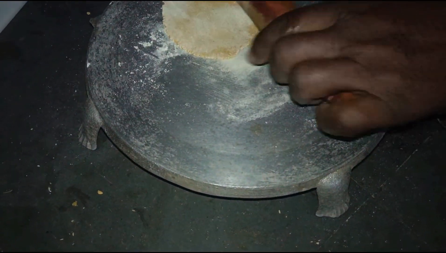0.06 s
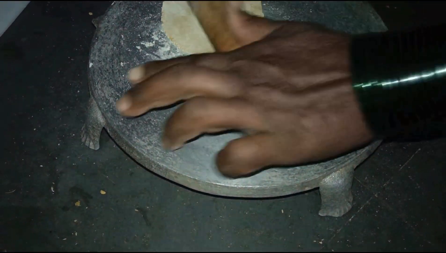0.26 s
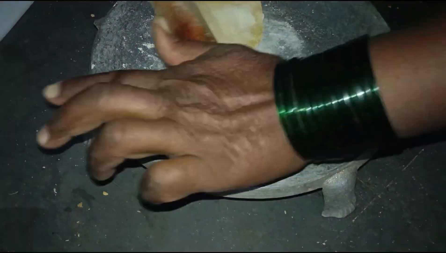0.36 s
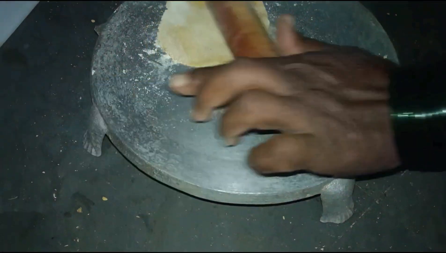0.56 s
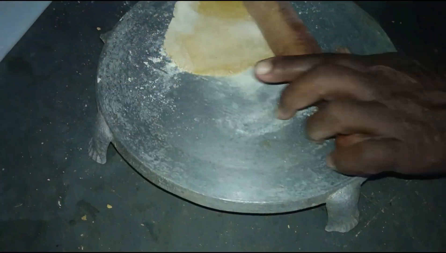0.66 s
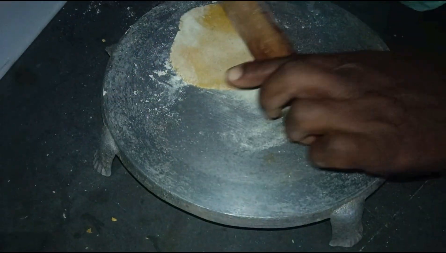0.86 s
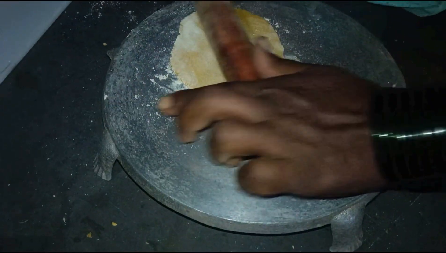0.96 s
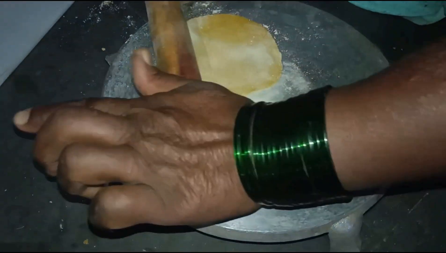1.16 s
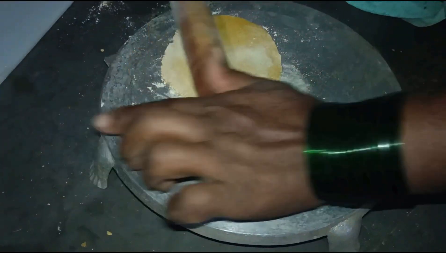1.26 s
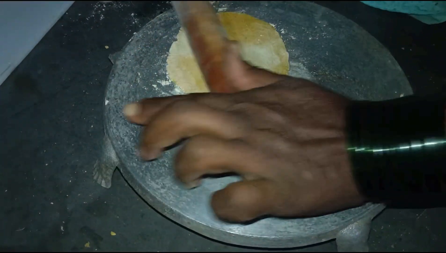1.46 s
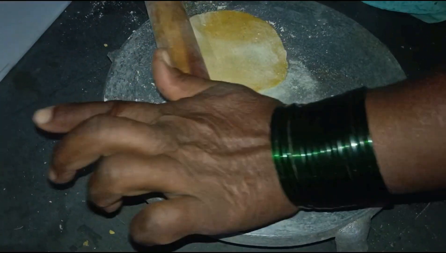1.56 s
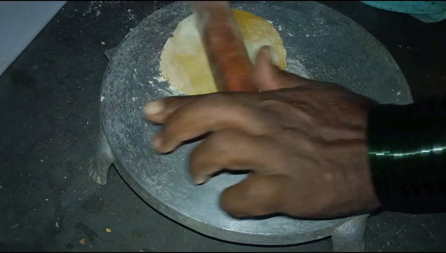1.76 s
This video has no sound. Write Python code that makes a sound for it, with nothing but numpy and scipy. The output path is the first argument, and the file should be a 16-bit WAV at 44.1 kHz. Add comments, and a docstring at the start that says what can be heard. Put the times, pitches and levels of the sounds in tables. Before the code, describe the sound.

A wooden rolling pin strikes a metal board with a sharp clatter, then rumbles over dough; it rubs and groans, knocks again, and ends with light taps and bangle clinks, close in a hard-walled kitchen.

```python
"""A wooden rolling pin works dough on a three-legged metal board in a bare kitchen, close to a phone.
Hard blows ring pin and board first; a soft dough thud, a low rumble and floury hiss follow.
Around 0.7 s the pin rubs and groans and a glass bangle clinks; near 1 s more blows land and the dough rumbles on.
Light knocks, more clinks and faint groans end it. Blows and clinks are decaying tones and noise bursts with
a tail from the hard walls; rumble, rubbing and hiss are noise shaped by resonances and level curves."""
import sys
import numpy as np
from scipy import signal
from scipy.io import wavfile
from scipy.ndimage import uniform_filter1d

SR = 44100
rng = np.random.default_rng(int(sys.argv[2]) if len(sys.argv) > 2 else 0)


def transcribe(u):
    """Save the signal u as a 16-bit wav file named by the first command-line argument.

    u: samples, shape (n,) or (channels, n), limited to [-1, 1]; the rate is SR.
    q: integer samples, one column per channel.
    """
    v = np.clip(np.atleast_2d(u).T, -1, 1)
    q = np.round(v * 32767).astype(np.int16)
    wavfile.write(sys.argv[1], SR, q)


N = 79380  # samples, 1.8 s

FLICKER_DB, FLICKER_HZ = 5, 30.24  # usual spread of the random levels before smoothing, new levels per second
PORT_HZ = 1265  # the left-right difference grows with pitch up to here


def undb(db):
    """Turn decibels into a gain: 20 dB is ten times the amplitude."""
    return 10 ** (np.asarray(db) / 20)


def curve(table, axis):
    """Follow one column of a table over time in straight lines; column 0 holds the times."""
    rows = np.array(table, float)
    return np.interp(np.arange(N) / SR, rows[:, 0], rows[:, axis])


def band(x, hz, width_hz):
    """Pass a sound twice through one resonance, then set its rms to 1."""
    b, a = signal.iirpeak(min(hz, .45 * SR), hz / width_hz, SR)
    once = signal.lfilter(b, a, x)
    twice = signal.lfilter(b, a, once)
    return twice / np.sqrt(np.mean(twice ** 2))


def spread(pan_db):
    """Left and right gains whose difference is pan_db; positive is louder on the left."""
    return undb(np.array([pan_db, -pan_db]) / 2)


def add(out, sound, at_s):
    """Mix a sound in at its start time, cut off at the end of the scene."""
    k = int(at_s * SR)
    out[:, k:k + sound.shape[1]] += sound[:, :N - k]


def ring(modes, chance, sign=-1, detune=.018):
    """A struck body rings in decaying sines; chance shifts their pitch, level and left-right phase."""
    rise_s, scatter_db, port_phase_rad = 0.00022, 1.5, 1.7
    count = len(modes)
    hz, db, t60 = np.array(modes, float).T[:, :, None]
    t = np.arange(SR // 4) / SR
    hz = hz * (1 + detune * chance[:count, None])
    # each sine reaches the phone's two ports out of step, less so in the bass
    lead = port_phase_rad * np.minimum(hz / PORT_HZ, 1) * np.sign(chance[:count, None]) / 2
    decay = 1000 ** (-t / np.maximum(t60, 1e-3))  # 60 dB down after t60
    size = undb(db + scatter_db * chance[-count:, None]) * decay
    size = size * sign ** np.arange(count)[:, None]  # sign -1 turns every second sine over
    size = size * (1 - np.exp(-t / rise_s))
    return np.array([(size * np.sin(2 * np.pi * hz * t + s * lead)).sum(0) for s in (1, -1)])


def noise(bands, alike, flicker_db=FLICKER_DB):
    """Noise in resonances that flicker each alone, rms 1; alike is how much left and right agree."""
    out, hold = 0, int(SR / FLICKER_HZ)
    alike = np.clip(alike, 0, 1)
    for hz, width_hz, db in bands:
        mid, side = band(rng.standard_normal((2, N)), hz, width_hz)
        steps = np.repeat(rng.standard_normal(200)[:N // hold + 1], hold)
        walk = uniform_filter1d(steps, hold)[:N]  # the random steps become slopes
        pair = np.sqrt(1 + alike) * mid + np.sqrt(1 - alike) * side * np.array([[1], [-1]])
        out = out + undb(db + flicker_db * walk) * pair / np.sqrt(2)
    return out / np.sqrt(np.mean(out ** 2))


def knocks():
    """Each blow pushes pin and board for its contact time (longer is duller); the loose board clatters."""
    # blows: start_s, pin_db, board_db, clatter_db (all before the low cut and the push), contact_ms,
    # lowest_hz that sounds, spot_hz that the struck spot favours, room_db sent to the walls
    blows = [(0.2129, -13.5, -27, -13.5, 0.12, 806, 1906, -4),
             (0.2189, -27, -16, -17, 0.37, 636, 1400, -0.5), (.2250, -40, -24, -18.5, 0.55, 324, 650, -2),
             (.6915, -69, -48, -68.5, 0.56, 250, 423, 3.5), (.7812, -33.5, -32, -35, 0.55, 800, 1310, -6),
             (.7960, -58, -37, -49.5, 0.24, 900, 1345, -21), (.8010, -46.5, -41, -49, 0.58, 900, 1400, -11),
             (.9668, -34.5, -16, -24, 0.83, 150, 468, -7), (.9694, -34, -20.5, -35, 0.4, 303, 1340, -9),
             (0.9742, -30, -18, -15, 0.16, 300, 1460, -6.5),
             (.9770, -40.5, -32.5, -57.5, 0.31, 600, 1900, -6),
             (.9810, -52.5, -30, -71, 0.75, 396, 1400, -13.5), (.9900, -20, -24.5, -40.5, 2, 249, 543, -4),
             (1.396, -57, -31.5, -38, 0.27, 330, 720, -13.5), (1.427, -54, -51, -47, 3.2, 149.3, 358, -20),
             (1.4985, -47, -42, -41.5, 0.64, 920, 1470, -7.5)]
    # tones of the wooden pin, before scatter: pitch_hz, level_db, t60_s (time to fall 60 dB)
    pin_tones = [(1174, 7.5, 0.016), (1255, 2.5, 0.03), (1862, 1, 0.032), (2710, 2, 0.014),
                 (2886, 0.5, 0.031), (3134, 3.5, 0.03), (3964, -3, 0.03)]
    # tones of the metal board, before scatter and spot: pitch_hz, level_db, t60_s
    board_tones = [(279.1, -7.5, 0.12), (405.2, -8, 0.06), (505, -7, 0.065), (608, -13.5, 0.084),
                   (712.4, -4, 0.066), (822, 1.5, 0.03), (1201, 1, 0.047), (1328, 6, 0.041),
                   (1446, 4, 0.034), (1711, 3, 0.032), (1991, 13.5, 0.0087), (2454, 2.5, 0.023)]
    # noise of the board clattering on its legs: centre_hz, width_hz (of one pass), relative level_db
    clatter_bands = [(765, 930, 3.5), (1510, 2700, -15), (3020, 3650, 1), (4580, 2250, -2.5),
                     (7550, 3300, -24.5)]
    spot_db_per_octave = 6  # loss away from the favoured pitch
    clatter_s, room_feed_s = 0.0072, .007  # time constants

    out, far = np.zeros((2, 2, N))
    rattle = noise(clatter_bands, 0.5, 0)
    fade = np.arange(SR // 4) / SR / clatter_s
    chances = rng.standard_normal((40, 2, 28))
    for blow, chance in zip(blows, chances):
        at, pin_db, board_db, clatter_db, contact_ms, low_hz, spot_hz, room_db = blow
        t = np.arange(256) / SR * 1000 / max(contact_ms, .03)  # in contact times
        push = t ** 2 * np.exp(-6 * t)

        board = [(hz, db - spot_db_per_octave * abs(np.log2(hz / spot_hz)), t60)
                 for hz, db, t60 in board_tones]
        k = int(at * SR / 2)  # where this blow takes its stretch of the rattle
        burst = rattle[:, k:k + len(fade)] * np.sqrt(fade) * np.exp(-fade)
        # every burst gets the same energy
        burst = burst * np.sqrt(clatter_s * SR / 4 / np.sum(burst ** 2, axis=1, keepdims=True))

        body = undb(pin_db) * ring(pin_tones, chance[0])
        body = body + undb(board_db) * ring(board, chance[1], 0.99)
        body = body + undb(clatter_db) * burst
        body = signal.sosfilt(signal.butter(2, low_hz, "high", fs=SR, output="sos"), body)
        body = signal.fftconvolve(body, push[None] / push.sum())
        add(out, body, at)

        # the walls hear mostly the crack, at the strength of the whole blow
        crack = body * np.exp(-np.arange(body.shape[1]) / SR / room_feed_s)
        add(far, undb(room_db) * crack * np.std(body) / np.std(crack), at)
    return out, far


def sliding():
    """The pin rubs the board's resonances; floury hands and dough hiss above."""
    # the pin rubbing over the board: start_s, level_db, low_band_db, left_minus_right_db
    rub_curve = [(0, -80, -96, -2), (.03, -69.5, -103, -2), (.11, -80, -118, -4), (.19, -64, -79, 2),
                 (.5, -61, -55.5, -1), (.67, -56.5, -62.5, 0.5), (.7, -48, -51.5, 0.5),
                 (.79, -48, -53.5, -2.5), (.84, -49.5, -59.5, 1.5), (.9, -64.5, -87, 0),
                 (1.38, -69.5, -73.5, 2), (1.45, -72, -63, 8), (1.55, -65, -88, -1), (1.6, -69, -82, 8),
                 (1.65, -83.5, -72.5, -8.5), (1.68, -97.5, -100.5, -8), (1.725, -121, -95, 15.5),
                 (1.745, -64.5, -79, -9), (1.8, -53, -70.5, -1)]
    # resonances of the rubbed board: centre_hz, width_hz (of one pass), relative level_db
    rub_bands = [(1415, 370, 0), (1788, 460, -2), (2500, 430, -1.5), (2730, 770, -7)]
    # lower resonances of the rub: centre_hz, width_hz, relative level_db
    low_rub_bands = [(771, 190, -4), (525, 730, -18)]
    # floury hands and dough sliding: start_s, low_hiss_db, high_hiss_db
    hiss_curve = [(0, -84, -77), (.03, -65, -64.5), (.11, -73.5, -73), (.18, -64.5, -67), (.3, -47, -65),
                  (.44, -67, -65), (.5, -77, -84), (.545, -57.5, -71), (.57, -57, -60.5), (.69, -61, -65.5),
                  (.74, -51.5, -52), (.8, -43, -58.5), (.84, -51.5, -75), (.885, -64.5, -81),
                  (.94, -63.5, -68.5), (1.1, -58.5, -67), (1.2, -70.5, -76.5), (1.26, -76, -85.5),
                  (1.35, -64, -64.5), (1.41, -67.5, -70.5), (1.48, -81.5, -80), (1.55, -65.5, -60.5),
                  (1.6, -69, -68.5), (1.65, -65.5, -71), (1.7, -81, -84), (1.745, -68, -69.5),
                  (1.8, -58, -69.5)]
    # lower part of the hiss: centre_hz, width_hz, relative level_db
    low_hiss_bands = [(3908, 1020, -2.5), (5393, 680, -6.5)]
    # upper part of the hiss: centre_hz, width_hz, relative level_db
    high_hiss_bands = [(7680, 1580, 0), (10060, 1800, -3), (13000, 1300, -17)]

    rub = noise(rub_bands, 0.26) * undb(curve(rub_curve, axis=1))
    rub = rub + noise(low_rub_bands, 0.65, 1) * undb(curve(rub_curve, axis=2))
    hiss = noise(low_hiss_bands, 0.16) * undb(curve(hiss_curve, axis=1))
    hiss = hiss + noise(high_hiss_bands, 0.11) * undb(curve(hiss_curve, axis=2))
    hiss_pan_db = -2  # a little to the right
    return rub * spread(curve(rub_curve, axis=3)) + hiss * spread(hiss_pan_db)[:, None]


def dough():
    """Soft thuds are short low sines; dough and board legs rumble as low noise while the pin rolls."""
    # rumble over time: start_s, level_db
    rumble_curve = [(0, -91), (.2, -101), (.26, -48.5), (.42, -69.5), (.79, -97), (.83, -50.5), (.92, -71),
                    (.95, -84), (1.02, -46), (1.15, -51.5), (1.26, -64), (1.34, -82.5), (1.41, -54.5),
                    (1.48, -59), (1.61, -70.5), (1.65, -95), (1.8, -85)]
    # rumble resonances: centre_hz, width_hz (of one pass), relative level_db
    rumble_bands = [(65.6, 69, -17), (118, 36.4, 0), (180, 100, 0)]
    # thuds: start_s, level_db (where the decay starts), pitch_hz
    thuds = [(0.2142, -45, 151.3), (0.809, -38.5, 148), (0.965, -35.5, 140)]
    thud_t60_s = 0.024

    out = noise(rumble_bands, 0.9, 0) * undb(curve(rumble_curve, axis=1))
    t = np.arange(SR // 4) / SR
    for at, db, hz in thuds:
        thud = np.sin(2 * np.pi * hz * t) * 1000 ** (-t / thud_t60_s)
        add(out, undb(db) * np.ones((2, 1)) * thud, at)
    return out


def groans():
    """The loaded pin drags in short rough tones whose phase and level waver at random."""
    # groans: start_s, length_s (before the release), pitch_hz, level_db (at the start, before the
    # wavering), left_minus_right_db
    drags = [(0.692, 0.066, 385, -49, -4), (0.691, 0.055, 742, -53, -4), (0.756, 0.011, 1500, -51, -1),
             (0.796, 0.01, 1370, -43, -1), (1.58, 0.085, 790, -63, -4.5), (1.572, 0.065, 1370, -66, -10),
             (1.583, 0.07, 2372, -68, 3), (1.735, 0.03, 1200, -62, -23), (1.775, .03, 1283, -62, -12)]
    edge_s, fade_db_per_s = 0.0047, 62
    rough_rad, grain_db = 1.3, 4  # usual size of the phase and level wavering
    smooth = SR // 130  # samples; a shorter window wavers faster

    out, t = np.zeros((2, N)), np.arange(N) / SR
    for (at, length, hz, db, pan_db), chance in zip(drags, rng.standard_normal((12, N))):
        attack = np.clip((t - at) / edge_s, 0, 1)
        release = np.exp(-np.maximum(t - at - length, 0) / (2 * edge_s))
        waver = uniform_filter1d(uniform_filter1d(chance, smooth), smooth)
        waver = waver / waver.std()
        tone = np.sin(2 * np.pi * hz * t + rough_rad * waver)
        tone = undb(grain_db * waver[::-1]) * tone  # backwards, so level and phase differ
        level = undb(db - fade_db_per_s * np.maximum(t - at, 0))
        out += level * attack * release * tone * spread(pan_db)[:, None]
    return out


def bangles():
    """Glass rings touch: a noise crack, a main tone and its short-lived neighbours."""
    # clinks: start_s, level_db (of the whole clink), pitch_hz, left_minus_right_db, t60_s,
    # crack_db (over the clink level)
    clinks = [(0.7127, -50, 7540, -14, .017, -4), (1.4245, -53.5, 11300, -11, 0.058, -16),
              (1.5232, -58, 8100, -8, 0.012, 0.5), (1.5352, -47, 9740, -12, .017, -5),
              (1.5415, -49.5, 6870, -7.5, 0.028, -4), (1.5585, -46.5, 7760, -12, 0.012, -3.5),
              (1.5618, -48, 11250, -6, 0.085, -5)]
    # neighbour tones: multiple of the clink pitch, level_db over the crack, t60_s
    neighbours = [(.86, -1.5, .015), (1.32, -2.5, .015)]
    crack_s = 0.0053  # time constant

    out, t = np.zeros((2, N)), np.arange(SR // 4) / SR
    chances = rng.standard_normal((20, SR // 4 + 8))
    for (at, db, hz, pan_db, t60, crack_db), chance in zip(clinks, chances):
        crack = undb(crack_db) * band(chance[8:], hz, 6000) * np.exp(-t / crack_s)
        modes = [(hz, 0, t60)]
        for multiple, over_db, short_t60 in neighbours:
            modes.append((min(hz * multiple, .33 * SR), over_db + crack_db, short_t60))
        tones = ring(modes, chance[:8], detune=0)
        add(out, undb(db) * (tones + crack) * spread(pan_db)[:, None], at)
    return out


def room(x):
    """Hard walls: dense echoes build up, then die band by band; left and right differ above the bass."""
    # the echoes by band: centre_hz, t60_s, relative level_db (before the weighting by pitch)
    echo_bands = [(133, 0.34, -35), (284, 0.57, 1.5), (492, 0.53, 5), (958, 0.63, 0), (2200, 0.74, -3),
                  (4130, 0.59, 6), (7400, 0.2, 5.5)]
    build_s = 0.014

    t, tail = np.arange(SR) / SR, 0
    for hz, t60, db in echo_bands:
        mid, side = band(rng.standard_normal((2, SR)), hz, 1.09 * hz)
        pair = mid + min(hz / PORT_HZ, 1) * side * np.array([[1], [-1]])
        tail = tail + undb(db) * np.sqrt(hz) * pair * 1000 ** (-t / t60)
    tail = tail * (1 - np.exp(-(t / build_s) ** 2))
    tail = tail / np.sqrt(np.sum(tail ** 2) / 2)  # mean energy of the two sides is 1
    return signal.fftconvolve(x.mean(0)[None], tail)[:, :N]


def kitchen():
    """A faint low noise, flickering in level, the same on both sides."""
    # kitchen noise: centre_hz, width_hz (of one pass), relative level_db
    floor_bands = [(130, 160, 0)]
    return undb(-91) * noise(floor_bands, 1.0)


def scene():
    """Mix all sources with the room's answer to blows and clinks."""
    blows, far = knocks()
    glass = bangles()
    wet = room(far + undb(-9) * glass)  # clinks reach the walls 9 dB down
    return blows + glass + wet + dough() + sliding() + groans() + kitchen()


def record(dry):
    """The phone cuts the deep bass gently and the top steeply."""
    low_cut_hz, top_hz = 65, 15400
    dry = signal.sosfilt(signal.butter(2, low_cut_hz, "high", fs=SR, output="sos"), dry)
    return signal.sosfilt(signal.ellip(8, .2, 70, top_hz, fs=SR, output="sos"), dry)


dry = scene()
out = record(dry)
transcribe(out)
```